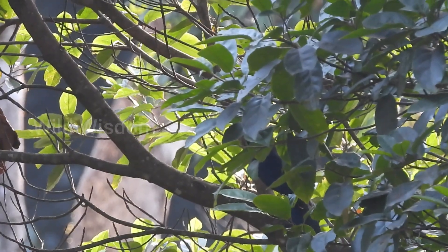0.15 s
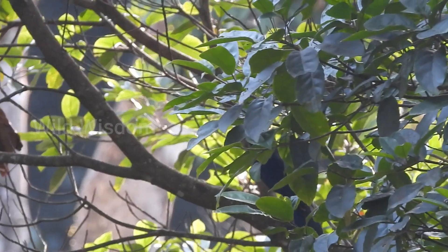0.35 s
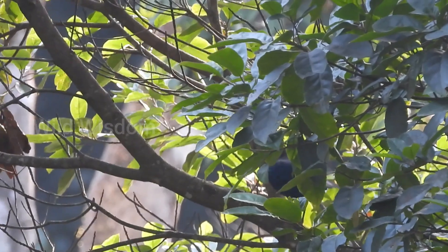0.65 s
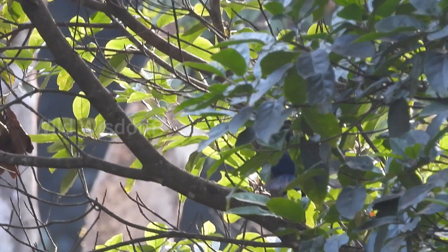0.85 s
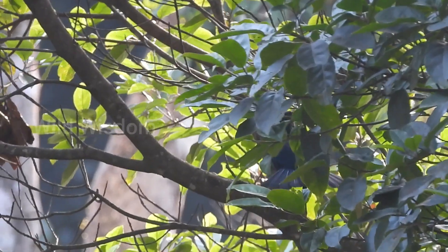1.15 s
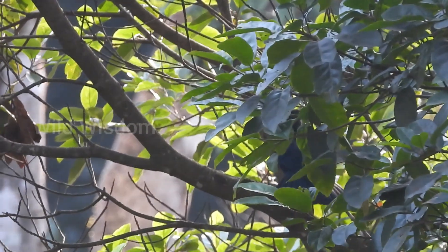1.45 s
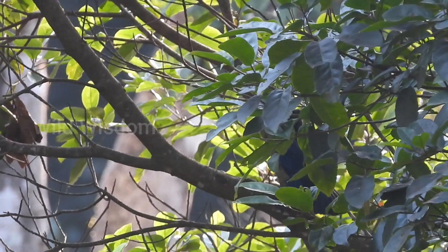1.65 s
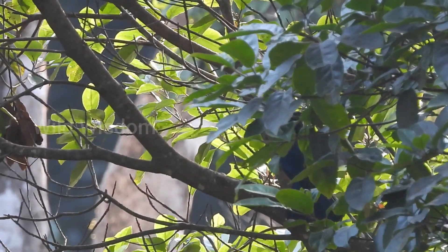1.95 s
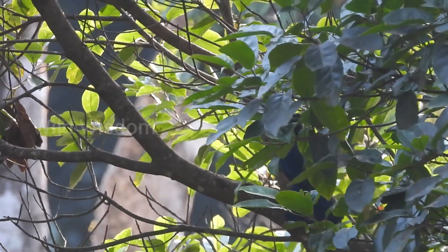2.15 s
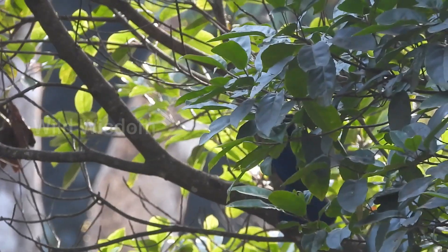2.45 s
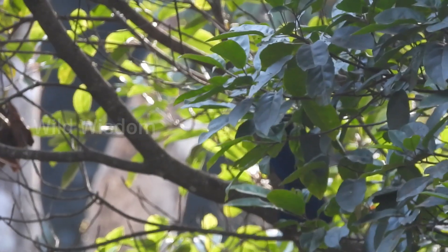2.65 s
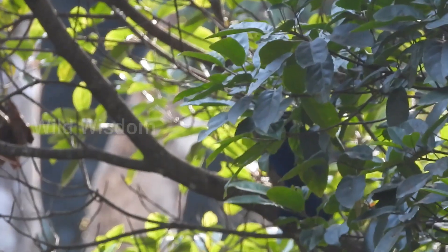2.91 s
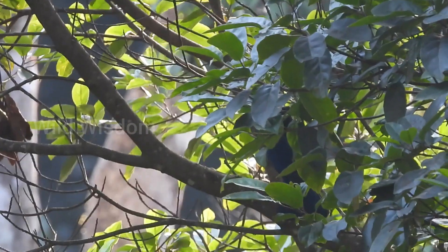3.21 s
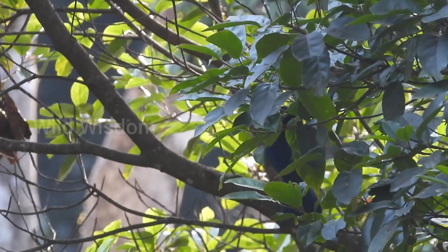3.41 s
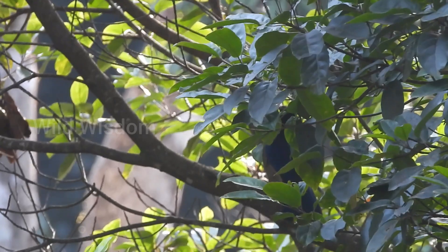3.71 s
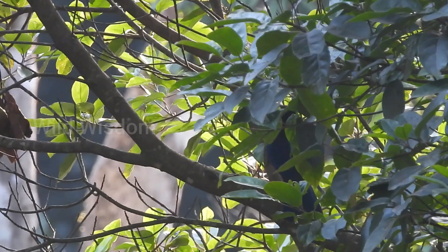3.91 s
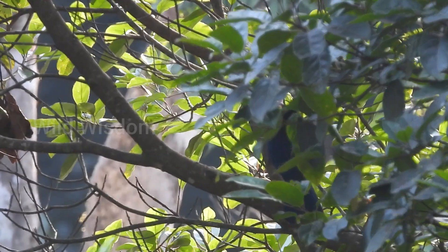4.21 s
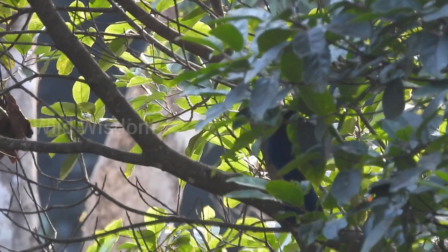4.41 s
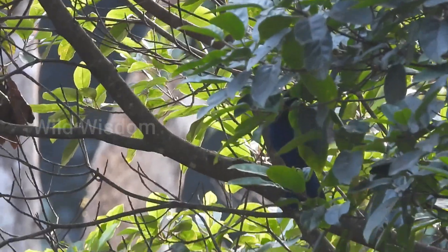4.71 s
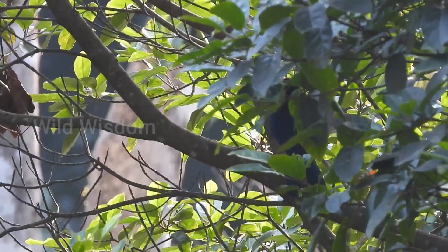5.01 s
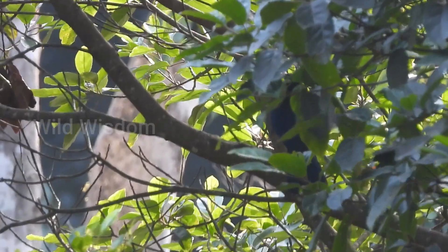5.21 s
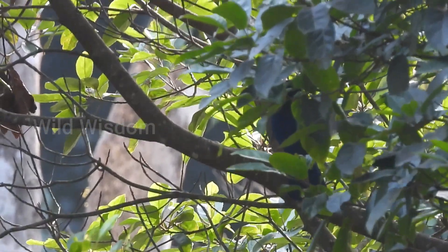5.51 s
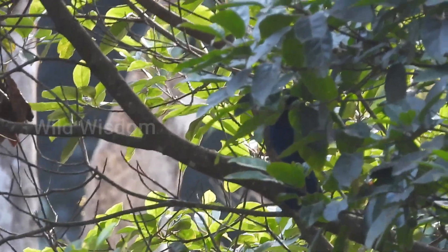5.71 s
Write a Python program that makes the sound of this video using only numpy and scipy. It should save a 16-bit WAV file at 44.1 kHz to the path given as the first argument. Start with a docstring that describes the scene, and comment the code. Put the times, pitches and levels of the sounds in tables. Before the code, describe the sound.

A bird in a leafy forest gives a loud, harsh, high screech, then a soft held whistle and four rising whistles. A second screech follows, trailed by quiet twittering. Short chips and thin buzzy chirps fall in between, and the notes ring among the trees. Behind them, insects hiss steadily over a low rush and faint distant hoots.

```python
"""Two harsh screeches ring out from a thrush in a forest, each followed by soft, sliding whistles.
The bird sings with both sides of its voice box at once; the two voices mix and make extra tones.
High buzzy chirps and short chips fall in between; trunks and leaves scatter the notes into a long tail.
Behind them, insects hiss steadily near 6 kHz over a low rush and faint, distant hoots."""
import sys
import numpy as np
from scipy import signal
from scipy.fft import rfft, irfft
from scipy.io import wavfile

SR = 44100
rng = np.random.default_rng(int(sys.argv[2]) if len(sys.argv) > 2 else 0)


def wav_record(signal):
    """Record a signal, one row per channel, as 16-bit PCM in the file named by sys.argv[1]."""
    frames = np.transpose(np.atleast_2d(signal))
    bounded = np.clip(frames, -1, 1)
    # unit amplitude maps onto the largest positive 16-bit level
    quanta = np.round(bounded * 32767).astype(np.int16)
    wavfile.write(sys.argv[1], SR, quanta)


N = 258426
TIME = np.arange(N) / SR
CUTOFF_HZ = 16500

# Levels in the tables are starting values: the functions turn whole layers up or down.
# How the low rush rises and falls. Each row: time in seconds, level in dB.
RUSH_LEVELS = [(0.0, -60.5), (.2, -59), (.45, -54.5), (.66, -59), (1.15, -56.5), (1.6, -54.5),
               (1.78, -64.5), (2.0, -59.5), (2.25, -58.5), (2.45, -61.5), (2.7, -60), (2.95, -53.5),
               (3.21, -62), (3.56, -55.5), (3.9, -62), (3.98, -57.5), (4.32, -58), (4.36, -57), (4.44, -62),
               (4.47, -59.5), (5.68, -60.5), (5.86, -60)]
# The tone colours of the rush and the insects. Each row: frequency in Hz, level in dB.
RUSH_SPECTRUM = [(40, -50.5), (95, -27.5), (160, -7), (210, 0.5), (280, -1.5), (480, -0.5), (620, -0.5),
                 (830, 0.5), (1100, -2.5), (1500, -3.5), (1900, -6), (3300, -7), (4200, -4.5), (6000, -15),
                 (14000, -63.5)]
INSECT_SPECTRUM = [(120, -40), (3000, -20), (4300, -10.5), (5200, -8), (5650, -3.5), (5900, 1.5), (6220, 2),
                   (6450, -5.5), (7000, -14), (8000, -24.5), (10000, -30), (13000, -38), (16000, -67.5)]
# How alike the background is on the left and right. Each row: frequency in Hz, likeness from 0 to 1.
STEREO_LIKENESS = [(60, .1), (130, 0.59), (240, 0.62), (500, 0.52), (950, 0.67), (1900, 0.52), (3800, 0.19),
                   (6200, 0.026), (15000, .05)]
# Echoes off nearby trunks. Each row: delay in seconds, level in dB, lean to the left in dB.
TRUNK_ECHOES = [(.0058, -16, 1.5), (.0125, -20, -3), (.029, -18, 3), (.047, -22, -2.5)]
# How long the forest rings. Each row: frequency in Hz, seconds to fade by 60 dB.
FOREST_FADE_TIMES = [(1500, 1.76), (3000, 1.13), (4700, 1.5), (7000, 1.45), (14000, 1.33)]
# A hollow bump and its octave. Each row: start and length in seconds, pitch in Hz, level in dB.
BUMP_TONES = [(4.327, 0.071, 228.4, -47), (4.333, 0.089, 461, -51.5)]
# Brief rustles. Each row: peak time and spread in seconds, low and high edge in Hz, level in dB.
RUSTLES = [(0.339, 0.003, 5700, 7100, -29.5), (.349, .014, 2930, 9800, -47),
           (0.355, 0.017, 5170, 6800, -38), (4.185, 0.031, 2850, 8900, -62.5),
           (4.38, 0.032, 3930, 10200, -61.5)]
# The clearer distant hoots. Each row: start in seconds, pitch in Hz, level in dB.
CLEAR_HOOTS = [(1.06, 632, -55), (1.095, 808, -56), (1.66, 632, -58), (2.23, 693, -60), (3.295, 806, -64),
               (3.525, 643, -57), (3.56, 785, -51.5), (4.93, 640, -59), (4.97, 804, -62), (5.145, 618, -66)]
# Faint, far notes. Each row: start and length in seconds, pitch in Hz, level in dB.
FAR_NOTES = [(0.104, 0.025, 1375, -56.5), (1.755, 0.06, 1470, -55), (1.833, 0.052, 1486, -56),
             (2.10, 0.056, 1487, -51.5), (2.16, 0.084, 1470, -48), (2.298, 0.038, 1534, -57.5),
             (2.509, 0.03, 1520, -59.5), (4.193, 0.057, 1390, -56), (4.284, 0.049, 1296, -48.5),
             (4.86, 0.22, 1479, -56.5)]
# Short chips. Each row: start in seconds, middle pitch in Hz, level in dB.
CHIPS = [(.086, 4380, -36), (.72, 4570, -29), (1.198, 4350, -34.5), (2.748, 4400, -34.5),
         (3.161, 4360, -35), (3.826, 4375, -34.5), (4.459, 4330, -37), (4.9693, 4377, -33.5)]
# The two pips of a chip. Each row: delay in seconds, pitch shift in octaves, level change in dB.
CHIP_PIPS = [(0, -.015, -4), (.0045, .01, 0)]
# Buzzy chirps. Each row: start and length in seconds, middle pitch in Hz, rise in octaves,
# level in dB, buzz rate in Hz, buzz depth from 0 to 1.
CHIRPS = [(0.097, 0.044, 7820, 0.013, -31, 350, 0.68), (.1305, 0.015, 7500, -0.053, -23.5, 200, .3),
          (1.029, 0.033, 7840, 0.015, -31, 329, 0.9), (1.059, 0.043, 7580, 0.005, -31.5, 208, .6),
          (1.94, 0.023, 7590, 0.022, -29, 199, 1), (1.966, 0.035, 7330, -0.026, -30, 206, 1),
          (1.995, 0.032, 7560, -0.015, -34.5, 230, 0.5)]
# Soft twittering. Each row: start and length in seconds, middle pitch in Hz, rise in octaves,
# level in dB, loudest point from 0 (start) to 1 (end).
TWITTER_NOTES = [(1.59, 0.035, 4050, 0.21, -45, 0.4), (1.615, 0.11, 2303, -0.067, -48, 0.33),
                 (3.303, 0.03, 2940, 0.38, -40.5, 0.13), (3.318, 0.027, 2346, 0.31, -44, 0.5),
                 (3.332, 0.046, 2563, 0.028, -38, 0.2), (3.378, 0.017, 2450, -0.076, -42.5, 0.84),
                 (3.405, 0.047, 2454, -0.14, -47.5, 0.4), (3.455, 0.039, 2450, 0.017, -42.5, 1),
                 (3.499, 0.034, 2844, -0.0067, -30, 0.38), (3.522, 0.019, 2720, -0.095, -36, 0.9),
                 (3.555, 0.064, 2726, 0.023, -44, 0.7), (3.589, 0.043, 2370, 0.4, -38.5, 1),
                 (3.603, 0.066, 1750, 0.368, -43.5, 0.32), (3.657, 0.023, 1900, -0.14, -43, 0),
                 (3.68, 0.048, 1910, 0.054, -45, 0.03), (3.694, 0.025, 2297, 0.29, -36, 0.23),
                 (3.717, 0.028, 2600, .17, -37.5, 0.44), (3.72, 0.027, 2225, 0.017, -40.5, 0.7),
                 (3.874, 0.0486, 1708, 0.4, -44, 0.44), (3.924, 0.058, 1846, 0.026, -47.5, 0.5),
                 (3.961, 0.046, 2330, 0.32, -43, 0.1), (3.992, 0.025, 2630, 0.065, -39, 0)]
# Upward slides. Each row: the same six columns as the twittering, then the lower voice's level in dB.
SLIDES = [(0.889, 0.098, 3196, 0.68, -39.5, 0.69, -59), (1.097, 0.11, 3160, 0.61, -33.5, 0.61, -48),
          (1.289, .11, 3026, 0.78, -32.5, 0.8, -53), (1.5, 0.092, 2933, .68, -31.5, 0.66, -54.5)]
# Two pure whistles. Each row: time in seconds, pitch in Hz, level in dB.
SHORT_WHISTLE = [(.325, 1660, -52), (.36, 1567, -47.5), (.44, 1440, -52), (.483, 1450, -35.5),
                 (.505, 1508, -48)]
LONG_WHISTLE = [(0.6, 1636, -45.5), (0.68, 1576, -42), (0.738, 1570, -56), (0.802, 1564, -36.5),
                (.845, 1524, -49), (.885, 1543, -42), (.925, 1522, -53.5), (.985, 1490, -41.5),
                (1.03, 1480, -57), (1.156, 1510, -37.5), (1.222, 1494, -50.5), (1.245, 1485, -27.5),
                (1.285, 1473, -33.5), (1.32, 1485, -35.5), (1.412, 1471, -33), (1.444, 1480, -48.5),
                (1.5, 1468, -42), (1.575, 1487, -41.5), (1.6, 1460, -55)]
# The high voice scoops up, holds, then sags as it swells; one list for each screech.
# Each row: time in seconds, pitch in Hz, level in dB, rattle depth from 0 to 1.
HIGH_VOICES = [
    [(.24, 4150, -45, .6), (.253, 4620, -34, .4), (.28, 4790, -37.5, .6), (.312, 5050, -36, .75),
     (.36, 5020, -26.5, 0.3), (.395, 4940, -29.5, 0.1), (.425, 4825, -18, 0.02), (.475, 4663, -22, .3),
     (.52, 4500, -21.5, 0), (.545, 4430, -29, 0)],
    [(2.708, 4100, -54, .8), (2.718, 4650, -42.5, .5), (2.745, 4950, -32, 0), (2.79, 5014, -33, 0.1),
     (2.83, 5000, -29, 0.2), (2.862, 4940, -19.5, 0), (2.89, 4780, -26.5, 0.47), (2.94, 4630, -23, 0),
     (2.98, 4567, -33, .2)],
]
# The low voice holds, then sags, while its overtone flares; one list for each screech.
# Each row: time in seconds, pitch in Hz, level in dB, overtone level in dB.
LOW_VOICES = [
    [(.245, 1783, -52.5, -51), (.272, 1814, -51, -43), (.296, 1800, -49, -24.5), (.338, 1785, -42.5, -39.5),
     (.356, 1762, -35.5, -26.5), (.39, 1710, -50, -39), (.45, 1676, -58, -40.5), (.495, 1616, -47, -43),
     (.53, 1598, -52.5, -53)],
    [(2.712, 1767, -50.5, -48), (2.727, 1820, -56.5, -54), (2.755, 1812, -51, -49),
     (2.772, 1853, -61.5, -40), (2.803, 1830, -46.5, -41), (2.83, 1810, -48.5, -26.5),
     (2.86, 1786, -41, -40), (2.89, 1657, -56, -51), (2.95, 1636, -55.5, -48)],
]
# Extra tones made as the voices mix. Each row: multiples of the high and the low pitch, to be added.
MIX_MULTIPLES = [(1, 1), (1, -1), (1, 2), (2, 0), (0, 3), (0, 4), (2, -1), (2, 1), (2, 2), (0, 7), (0, 8),
                 (0, 9)]
# The strength of each extra tone against the two voices, in dB.
MIX_LEVELS_DB = [-6.5, -17.5, -29.5, -30.5, -14.5, -22.5, -47, -41.5, -63.5, -48, -54, -57]
# Where the open beak rings: low and high edge in Hz.
BEAK_RING_HZ = (12480, 12850)


def from_db(db):
    """Turn decibels into a factor to multiply by."""
    return 10 ** (np.asarray(db) / 20)


def rms_one(x):
    """Scale a signal so its average (rms) level is 1."""
    return x / np.sqrt(np.mean(x ** 2) + 1e-20)


def in_time(rows):
    """Join timed rows with straight lines, giving one curve for each column."""
    times, *columns = np.transpose(rows)
    return [np.interp(TIME, times, column) for column in columns]


def at_hz(rows, hz):
    """Read a table between its frequencies, with octaves evenly spaced."""
    row_hz, values = np.transpose(rows)
    return np.interp(np.log(np.maximum(hz, 1)), np.log(row_hz), values)


def band(x, low_hz, high_hz, order=2):
    """Keep the sound between two frequencies."""
    return signal.sosfilt(signal.butter(order, [low_hz, high_hz], "band", fs=SR, output="sos"), x)


def drift(rate_hz):
    """A smooth random wander of typical size 1."""
    pole = np.exp(-2 * np.pi * rate_hz / SR)
    return rms_one(signal.lfilter([1], [1, -2 * pole, pole * pole], rng.standard_normal(N + SR))[SR:])


def phase_of(hz):
    """Add up a changing pitch into the angle of a wave."""
    return 2 * np.pi * np.cumsum(hz) / SR


def tone(phase, db):
    """A sine wave at the given rms level."""
    return np.sqrt(2) * from_db(db) * np.sin(phase)


def gate(rows, fade_s):
    """Fade in at the first row's time and out by the last."""
    return np.clip(np.minimum(TIME - rows[0][0], rows[-1][0] - TIME) / fade_s, 0, 1)


def note_shape(start, length, hz, octaves, db, crest, arch_octaves=0):
    """One note's samples, its pitch glide (an arch lowers both ends) and its swell up to the crest."""
    at = np.flatnonzero((TIME >= start) & (TIME < start + length))
    progress = (TIME[at] - start) / length
    glide = hz * 2 ** (octaves * (progress - .5) - arch_octaves * (2 * progress - 1) ** 2)
    swell = np.sin(np.pi * np.interp(progress, [0, np.clip(crest, .05, .95), 1], [0, .5, 1]))
    return at, glide, from_db(db) * np.abs(swell) ** 1.2


def pure_notes(rows, jitter, flutter_db=0):
    """Gliding sine notes; jitter shakes the pitch and flutter shakes the level."""
    out = np.zeros(N)
    wobble = 1 + jitter * drift(86)
    flutter = flutter_db * drift(48)
    for row in rows:
        at, hz, swell = note_shape(*row)
        out[at] += swell * tone(phase_of(hz * wobble[at]), flutter[at])
    return out


def left_right(shared, opposite, alike):
    """Blend two noises into left and right channels that are partly alike."""
    return np.sqrt(1 + alike) * shared + np.sqrt(1 - alike) * opposite * [[1], [-1]]


def stereo_noise(spectrum):
    """Noise from all around with the given tone colour, at rms level 1."""
    hz = np.arange(N // 2 + 1) * SR / N
    noise = left_right(*rfft(rng.standard_normal((2, N))), at_hz(STEREO_LIKENESS, hz))
    return rms_one(irfft(from_db(at_hz(spectrum, hz)) * noise, N))


def foliage(early_db=9.5, early_s=0.016, rise_s=0.018):
    """How leaves and trunks scatter a click: a dense early cloud, then a tail that fades band by band."""
    t, tail = TIME[:2 * SR], 0
    edges_hz = np.geomspace(700, 17000, 9)
    for low, high in zip(edges_hz, edges_hz[1:]):
        noise = band(rng.standard_normal((2, len(t))), low, high)
        decay = 10 ** (-3 * t / at_hz(FOREST_FADE_TIMES, np.sqrt(low * high)))
        tail = tail + decay * left_right(*noise, alike=0.49)
    tail = tail * np.minimum(t / rise_s, 1) * (1 + from_db(early_db) * np.exp(-t / early_s))
    return tail / np.sqrt(np.sum(tail ** 2) / 2)


def forest(call, scatter, tail_db, echo_db, pan_db):
    """A call arrives directly, then off a few trunks, then as a scattered tail."""
    sides = np.array([[.5], [-.5]])
    direct = call * from_db(pan_db * sides)
    echoes = 0
    for delay, db, lean_db in TRUNK_ECHOES:
        delayed = np.interp(TIME - round(delay * SR) / SR, TIME, call, left=0)
        echoes = echoes + delayed * from_db(db + echo_db + lean_db * sides)
    tail = from_db(tail_db) * signal.fftconvolve(call[None], scatter, axes=1)[:, :N]
    left, right = direct + echoes + tail
    return np.array([left, np.roll(right, 1)])   # the left microphone is a little nearer


def rush(boost_db=6, together_db=1.5, apart_db=2.37, flicker_hz=14):
    """A low rush whose lower bands flicker a little, both together and on their own."""
    rest, out = stereo_noise(RUSH_SPECTRUM), 0
    together = together_db * drift(flicker_hz)
    for edge_hz in (280, 560, 1120, 2240):
        part = signal.sosfiltfilt(signal.butter(2, edge_hz, fs=SR, output="sos"), rest)
        rest = rest - part
        out = out + part * from_db(together + apart_db * drift(flicker_hz))
    return from_db(in_time(RUSH_LEVELS)[0] + boost_db) * (out + rest)


def insects(level_db=-49.5, waver_db=0.51):
    """Many insects blend into one high, nearly steady hiss."""
    return from_db(level_db + waver_db * drift(26)) * stereo_noise(INSECT_SPECTRUM)


def bump(crest=.45):
    """A dull, hollow knock that swells and dies."""
    notes = [(start, length, hz, 0, db, crest) for start, length, hz, db in BUMP_TONES]
    return pure_notes(notes, jitter=0.028, flutter_db=0.5)


def rustles():
    """Short swells of noise, each in its own band."""
    out = np.zeros(N)
    for peak, spread, low, high, db in RUSTLES:
        swell = from_db(db) * np.exp(-.5 * ((TIME - peak) / spread) ** 2)
        out += swell * rms_one(band(rng.standard_normal(N), low, high, order=4))
    return out


def hoots(length_s=0.034, crest=.4, faint_per_s=22, faint_hz=831.7, faint_db=-67):
    """A few clear distant hoots among faint ones scattered around one pitch."""
    chance = rng.standard_normal((int(faint_per_s * N / SR), 3))
    faint = [((k + .5 + late) / faint_per_s, faint_hz * 2 ** (0.107 * up), faint_db + 2 * loud)
             for k, (late, up, loud) in enumerate(chance)]
    notes = [(start, length_s, hz, 0, db, crest) for start, hz, db in CLEAR_HOOTS + faint]
    return pure_notes(notes, jitter=0.013)


def far_notes(sag_octaves=0.039, crest=0.44):
    """Faint, far notes that each sink a little in pitch."""
    notes = [(start, length, hz, -sag_octaves, db, crest) for start, length, hz, db in FAR_NOTES]
    return pure_notes(notes, jitter=0.0057)


def chips(pip_s=.007, rise_octaves=.05, crest=.5):
    """Each chip is two hard pips that flick upward, the first lower and softer."""
    pips = [(start + delay, pip_s, hz * 2 ** shift, rise_octaves, db + pip_db, crest)
            for start, hz, db in CHIPS for delay, shift, pip_db in CHIP_PIPS]
    return pure_notes(pips, jitter=0.006)


def chirps(pitch_swing=0.04, pulse_db=6, settle_s=0.044, scoop_hz=650, scoop_s=.001, jitter=0.0068):
    """Each chirp flicks up from below, then its pitch and level shake together and settle."""
    out, wobble = np.zeros(N), jitter * drift(330)
    for *note, buzz_hz, depth in CHIRPS:
        at, hz, swell = note_shape(*note, crest=0.096, arch_octaves=0.088)
        t = TIME[at] - note[0]
        shake = depth * np.sin(2 * np.pi * buzz_hz * t) * np.exp(-t / settle_s)
        scoop = depth * scoop_hz * np.exp(-t / scoop_s)
        # the note is the second harmonic of a silent base tone; the third and fourth are faint
        base = phase_of(hz * (1 + pitch_swing * shake + wobble[at]) - scoop) / 2
        harmonics = tone(2 * base, 0) + tone(3 * base, -35) + tone(4 * base, -40)
        out[at] += swell * from_db(pulse_db * shake) * harmonics
    return out


def twitter():
    """Soft, quick notes that flutter in pitch and level."""
    return pure_notes(TWITTER_NOTES, jitter=0.011, flutter_db=3)


def whistle(rows, jitter=.0015, waver_db=3):
    """A soft, almost pure note that sinks and then holds."""
    hz, db = in_time(rows)
    phase = phase_of(hz * (1 + jitter * drift(50)))
    return tone(phase, db + waver_db * drift(22)) * gate(rows, fade_s=0.014)


def slides(lag_s=.058, lower_s=0.056, lower_hz=1970, lower_octaves=0.488):
    """Whistles that slide upward, each joined late by a lower voice with a shorter rise."""
    upper = [row[:-1] for row in SLIDES]
    lower = [(start + lag_s, lower_s, lower_hz, lower_octaves, db, crest)
             for start, *_, crest, db in SLIDES]
    voices = pure_notes(upper + lower, jitter=0.0091, flutter_db=3.5)
    return band(voices, 1500, 3720, order=6)   # the beak lets less out at the top of a slide


def screech(high_rows, low_rows, rattle_hz=285, rough_db=0.5, throb_db=1.5, rasp_db=-33, ring_db=-39):
    """Both sides of the voice box sing and mix. Returns the high voice with extras, and the low voice."""
    high_hz, high_db, rattle_depth = in_time(high_rows)
    low_hz, low_db, overtone_db = in_time(low_rows)
    high_phase = phase_of(high_hz * (1 + 0.0062 * drift(244)))
    low_phase = phase_of(low_hz * (1 + 0.0055 * drift(140)))
    # a fast beat makes the high voice harsh
    rattle = 1 + rattle_depth * np.sin(phase_of(rattle_hz * (1 + .08 * drift(40))))
    high_voice = rattle * tone(high_phase, high_db + rough_db * drift(200) + throb_db * drift(36))
    low_voice = tone(low_phase, low_db) + tone(2 * low_phase, overtone_db)
    joint_db = 0.5 * high_db + 0.57 * overtone_db
    mix_tones = sum(tone(m * high_phase + n * low_phase, joint_db + db)
                    for (m, n), db in zip(MIX_MULTIPLES, MIX_LEVELS_DB))
    mix_tones = band(mix_tones, 3080, CUTOFF_HZ, order=8)   # lower ones do not leave the beak
    # swirling air adds a rasp and makes the open beak ring
    air = rng.standard_normal(N)
    rasp = from_db(high_db + rasp_db) * rms_one(band(air, 5100, 9500, order=4))
    ring = from_db(joint_db + ring_db) * rms_one(band(air, *BEAK_RING_HZ))
    return np.array([high_voice + mix_tones + rasp + ring, low_voice]) * gate(high_rows, fade_s=0.0052)


def scene():
    """Bird calls echo through the forest over the rush and the insects."""
    scatter = foliage()
    high, low = sum(screech(*voices) for voices in zip(HIGH_VOICES, LOW_VOICES))
    whistles = whistle(SHORT_WHISTLE) + whistle(LONG_WHISTLE)
    birds = (from_db(8) * forest(hoots(), scatter, tail_db=-11, echo_db=-11, pan_db=0)
             + forest(far_notes(), scatter, tail_db=-11, echo_db=8.5, pan_db=0.5)
             + from_db(-0.5) * forest(chips(), scatter, tail_db=3.5, echo_db=1.5, pan_db=5)
             + from_db(-3) * forest(chirps(), scatter, tail_db=-5, echo_db=10.5, pan_db=2)
             + from_db(-4) * forest(twitter(), scatter, tail_db=-3.5, echo_db=3, pan_db=-1.5)
             + forest(whistles, scatter, tail_db=-17, echo_db=-37.5, pan_db=-3)
             + from_db(-2) * forest(slides(), scatter, tail_db=-3.5, echo_db=-4, pan_db=-4)
             + from_db(-2) * forest(low, scatter, tail_db=-3, echo_db=-7.5, pan_db=-0.2)
             + from_db(-2) * forest(high, scatter, tail_db=2, echo_db=-27, pan_db=-1.5))
    return rush() + insects() + bump() + rustles() + birds


def record(dry):
    """Cut off the very highest treble steeply."""
    return signal.sosfilt(signal.ellip(10, .1, 80, CUTOFF_HZ, fs=SR, output="sos"), dry)


dry = scene()
out = record(dry)
wav_record(out)
```